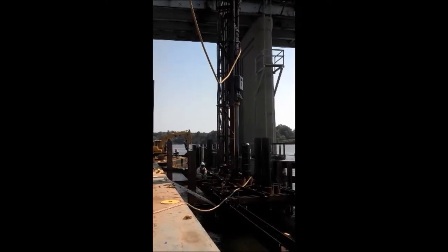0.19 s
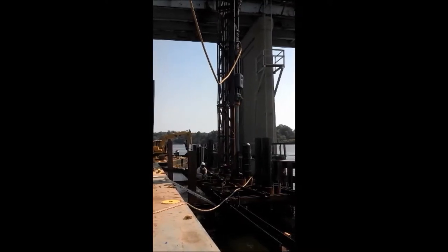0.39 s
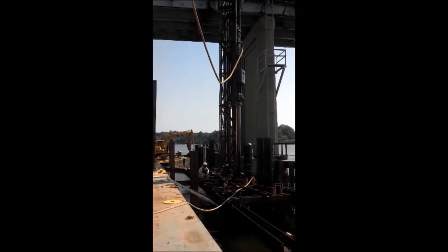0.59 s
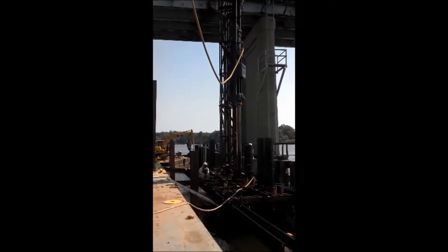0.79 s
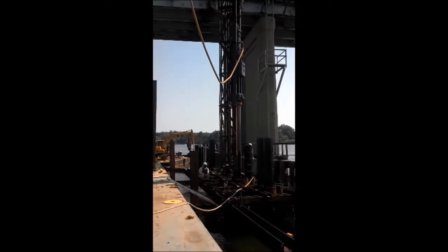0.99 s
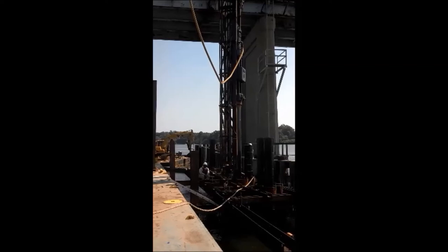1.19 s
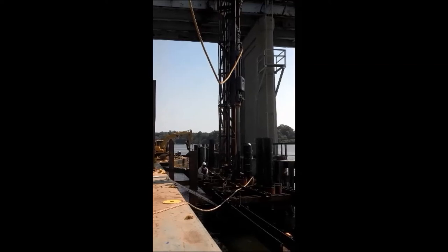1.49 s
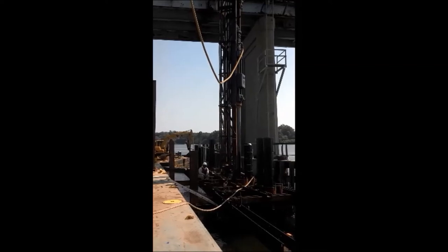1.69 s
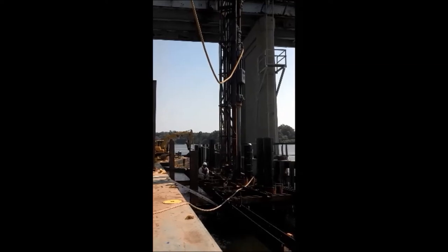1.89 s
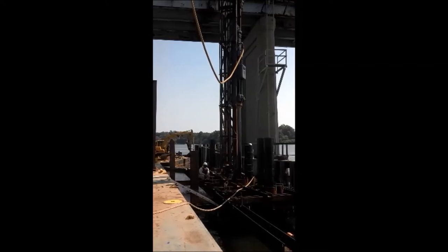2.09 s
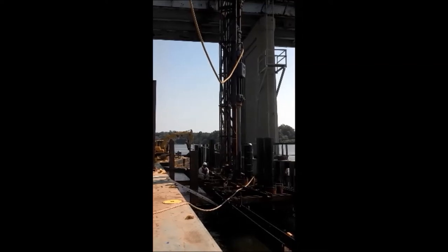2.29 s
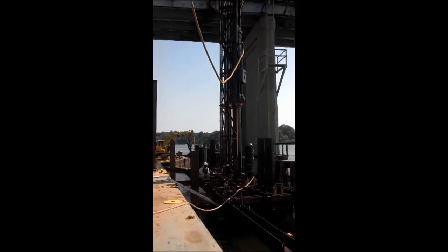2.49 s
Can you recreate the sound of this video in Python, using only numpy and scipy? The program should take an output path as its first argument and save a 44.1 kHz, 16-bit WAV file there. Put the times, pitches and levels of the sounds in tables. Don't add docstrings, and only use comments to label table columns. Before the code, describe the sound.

A pile hammer clangs twice on steel, hissing out spent air between blows over a steady engine-like drone

```python
import sys
import numpy as np
from scipy import signal
from scipy.fft import rfft, irfft, next_fast_len
from scipy.io import wavfile
from scipy.ndimage import uniform_filter1d

SR = 44100
rng = np.random.default_rng(int(sys.argv[2]) if len(sys.argv) > 2 else 0)


def output_pcm(signal):
    pcm = np.clip(np.atleast_2d(signal).T, -1, 1) * 32767
    wavfile.write(sys.argv[1], SR, np.round(pcm).astype(np.int16))


def decibels_to_gain(level_db):
    exponent = np.asarray(level_db, float) / 20
    return 10 ** exponent


N = 114660
T = np.arange(N) / SR

# frequency in Hz, level in dB.
DRONE_SPECTRUM = [(30, -45.5), (80, 6), (130, -4), (250, -1), (700, -1), (1200, -8.5), (3000, -20),
                  (10000, -34.5)]
DRONE_DB = -35
# time in seconds, level change in dB.
COMPRESSOR_LOAD = [(0, 0), (.15, 3), (.6, -1), (.75, -3), (.88, -1.5), (1.2, 0.5), (1.36, 1.5), (1.43, 3),
                   (1.9, -2.5), (2.08, -1), (2.18, 0.5), (2.45, 3), (2.6, -0.5)]
# frequency in Hz, width in Hz, level in dB.
HUMS = [(133, 10.5, -51), (204.6, 26, -48.5), (257, 8.4, -56), (406, 69, -55)]
WHINES = [(2014, 20, -59), (4042, 54, -63), (4360, 50, -68), (4700, 14, -60.5), (5870, 90, -70),
          (6820, 33, -67), (7770, 23, -71), (7950, 60, -93), (12150, 80, -79), (12620, 50, -92),
          (13740, 50, -92), (14050, 60, -104), (15600, 3200, -82)]

# start in seconds, level in dB, hold in seconds, pipe ring in dB.
EXHAUSTS = [
    (-.36, -21.5, .03, 3),
    (0.913, -20, 0.024, 4),
    (2.204, -20.5, 0.029, 2.5),
]
# frequency in Hz, level in dB.
EXHAUST_SPECTRUM = [(200, -13.5), (400, -2.5), (700, -3.5), (1300, -5.5), (2500, -4.5), (4200, -6.5),
                    (6500, -9), (10000, -19), (15000, -20)]
# frequency in Hz, time to fall 60 dB in seconds.
EXHAUST_T60 = [(200, 0.44), (1000, 1), (4000, 0.72), (16000, 0.3)]
# frequency in Hz, width in Hz, level in dB.
PIPE_MODES = [(723, 81, 3), (1120, 73, 2.5), (1407, 17, 10), (1770, 33, -4), (1900, 13, -14.5),
              (2135, 69, -5)]
OPENING_S, OPENING_DB = 0.017, -19
LINGER_DB, LINGER_T60 = -7, 1.24
PIPE_FALL_DB_PER_S = 46
GUST_DB = -0.5

# start in seconds, length in seconds, level in dB.
VALVES = [
    (0.163, 0.028, -28),
    (1.438, .03, -31.5),
]
# frequency in Hz, level in dB.
VALVE_SPECTRUM = [(400, -29), (900, -2), (2000, -1.5), (4000, -6.5), (6000, -14), (9000, -22), (16000, -46)]

# start in seconds, level in dB.
TAILS = [
    (0.271, -20.5),
    (1.543, -17.5),
]
# frequency in Hz, level in dB.
TAIL_SPECTRUM = [(80, -23), (140, -10.5), (260, -3.5), (700, -5), (1300, -10), (2200, -9), (4500, -19),
                 (16000, -55)]
# frequency in Hz, time to fall 60 dB in seconds.
TAIL_T60 = [(100, 1.97), (300, 2.59), (1000, 1.06), (4000, 0.61), (16000, 1.3)]

# frequency in Hz, 60 dB decay in seconds, first and second blow levels in dB.
FRAME_MODES = [(1186, 1, -31.5, -45), (2050, 0.77, -28, -53), (3100, 0.5, -53, -49), (3920, 1, -42.5, -53),
               (4200, 0.53, -45, -36), (4890, 0.53, -39, -39), (5460, 0.56, -35, -56),
               (6230, 0.45, -45, -39.5), (6950, 0.38, -37, -50), (13050, .4, -58, -58),
               (13870, 0.36, -39, -54), (14100, .4, -53, -60)]
WANDER_HZ = 9

# arrival in seconds, boom in dB, clang in dB, sizzle in dB.
ARRIVALS = [(0.2003, -12, -21, -23), (0.22, -22.5, -19, -49), (0.242, -12, -16, -47), (0.26, -19, -13, -23),
            (0.275, -9, -19, -28), (0.293, -39, -13.5, -25.5), (0.329, -19.5, -22, -38),
            (0.357, -24, -25, -33), (1.4742, -11.5, -17.5, -24.5), (1.492, -15.5, -19, -49),
            (1.514, -12.5, -19, -45), (1.534, -11, -15.5, -25.5), (1.551, -20, -16.5, -41),
            (1.573, -14.5, -35, -38), (1.605, -23, -48, -31.5), (1.63, -20, -47, -35.5),
            (1.659, -22.5, -46, -51)]
BLOW_STARTS = (ARRIVALS[0][0], ARRIVALS[8][0])
BOOM_T60, CLANG_T60, SIZZLE_T60 = 0.13, 0.19, 0.12
# frequency in Hz, width in Hz, level in dB.
BOOM_MODES = [(146, 25, -4.5), (190, 100, -13), (250.5, 28.5, 3.5), (332, 21, 12), (363, 16, 2),
              (470, 20.2, -10)]
CLANG_MODES = [(539, 20, 5), (652, 31, 4.5), (753, 31, 5), (1050, 126, -4.5), (1195, 60, 0),
               (1390, 56, -3.5), (1837, 37, -8.5), (1993, 23, -5), (2490, 58, -13)]
# frequency in Hz, level in dB.
CLANG_WASH = [(300, -15), (500, 0), (1000, 4.5), (2000, -10), (3000, -23), (5000, -36)]
SIZZLE_SPECTRUM = [(1500, -23.5), (2800, 2.5), (4200, 3.5), (6000, -4), (8000, -4.5), (10000, -9),
                   (13000, -15), (16000, -9)]
# frequency in Hz, level in dB, time to fall 60 dB in seconds.
ANVIL_RINGS = [(3680, -29, 0.096), (3830, -52, 0.12), (4480, -58, .25), (6700, -36, 0.16),
               (6850, -16, 0.031), (7100, -41, 0.08)]
CRACK_DB, CRACK_T60 = (-33, -22), 0.043
# delay in seconds, frequency in Hz, glide in Hz/s,
# length in seconds, level in dB.
THUDS = [(0.0012, 360, -1500, 0.04, -21.5), (0.0069, 145, -600, 0.024, -17.5),
         (0.037, 254, -500, 0.024, -8.5), (.058, 236.8, 2300, 0.035, -9), (0.02116, 315, 0, 0.011, -18),
         (0.0618, 570, 1495, 0.033, -17), (0.034, 400, 0, 0.038, -22), (0.11, 377, 0, 0.018, -21),
         (0.075, 257, 0, 0.023, -16.5), (0.086, 1600, 0, 0.031, -26), (.07, 1770, 0, 0.038, -25.5),
         (0.117, 225, 0, 0.019, -24)]
THUD_DB, THUD_PITCH = (-0.2, 0.4), (1.01, 1)

# frequency in Hz, turn in radians.
PORT_TURN = [(40, -6.2), (100, -4.9), (215, -3.1), (300, -2.3), (370, -.4), (580, 1.3), (900, .8),
             (1400, 0)]
# frequency in Hz, likeness from 0 to 1.
PORT_LIKENESS = [(40, 0.92), (250, 0.56), (600, 0.48), (1000, 0.79), (1500, 0.99), (3500, 0.9),
                 (5500, 0.79), (8300, 0.66), (16000, 0.32)]
# frequency in Hz, level in dB.
LEFT_DB = [(40, 1), (120, -3), (200, -6), (300, -8), (600, -2.5), (950, -2), (1400, 0), (16000, 0)]
PORT_LAG_S = 16 / SR
OPPOSED_LIKENESS = 0.63
LOW_CUT_HZ, EDGE_HZ, SUB_DB = 130, 15780, -55.5


def evened(x):
    return x / np.sqrt(np.mean(x ** 2) + 1e-20)


def read(points, hz):
    f, value = np.transpose(points)
    return np.interp(np.log(hz + 1), np.log(f + 1), value)


def noise(spectrum):
    z = rfft(rng.standard_normal((2, N)))
    z = z * decibels_to_gain(read(spectrum, np.fft.rfftfreq(N, 1 / SR)))
    return evened(irfft(z, N))


def wobble(samples):
    return evened(uniform_filter1d(rng.standard_normal(N), size=samples))


def resonate(x, modes):
    out = 0
    for hz, width, db in modes:
        b, a = signal.iirpeak(hz, hz / max(width, 2), SR)
        out = out + decibels_to_gain(db) * signal.lfilter(b, a, x)
    return out


def fading(start, t60, rise):
    t = np.maximum(T - start, 0)
    return np.minimum(t / rise, 1) ** 2 * decibels_to_gain(-120 * t / t60)


def dying(spectrum, t60s, starts, rise):
    hz, t, z = signal.stft(noise(spectrum), SR, nperseg=256, noverlap=192)
    t60 = read(t60s, hz)[:, None]
    power = 0
    for start, db in starts:
        elapsed = np.maximum(t - start - rise, 0)
        power = power + decibels_to_gain(2 * db - 120 * elapsed / t60) * (t > start - .004)
    return signal.istft(z * np.sqrt(power), SR, nperseg=256, noverlap=192)[1][:, :N]


def drone():
    load_db = np.interp(T, *np.transpose(COMPRESSOR_LOAD))
    wash = decibels_to_gain(DRONE_DB + load_db) * decibels_to_gain(1.1 * wobble(1500)) * noise(DRONE_SPECTRUM)
    return wash + 33.0 * resonate(rng.standard_normal((2, N)), HUMS + WHINES)


def reverberation():
    swell = sum(np.clip((T - s + .05) / 0.043, 0, 1) * (T < s + .6) for s, _ in TAILS)
    starts = [(s - .05, db) for s, db in TAILS]
    return dying(TAIL_SPECTRUM, TAIL_T60, starts, 0.021) * np.where(swell > 0, swell, 1)


def exhaust():
    out = 0
    for start, db, hold, ring_db in EXHAUSTS:
        opening = decibels_to_gain(OPENING_DB * np.clip(1 - (T - start) / OPENING_S, 0, 1)) * (T > start)
        air = dying(EXHAUST_SPECTRUM, EXHAUST_T60, [(start, db)], OPENING_S + hold)
        since_hold = np.maximum(T - start - OPENING_S - hold, 0)
        pipe = decibels_to_gain(ring_db - PIPE_FALL_DB_PER_S * since_hold) * resonate(air, PIPE_MODES)
        linger_db = db + LINGER_DB - 60 * np.maximum(T - start, 0) / LINGER_T60
        linger = decibels_to_gain(linger_db) * noise(EXHAUST_SPECTRUM)
        out = out + opening * (air + pipe + linger)
    return out * decibels_to_gain(GUST_DB * wobble(150))


def valve():
    shape = 0
    for start, length, db in VALVES:
        rise = np.clip((T - start) / 0.0051, 0, 1)
        fall = decibels_to_gain(-700 * np.maximum(T - start - length, 0))
        shape = shape + decibels_to_gain(db) * rise * fall
    return shape * noise(VALVE_SPECTRUM)


def frame():
    out = 0
    for hz, t60, *dbs in FRAME_MODES:
        beat = decibels_to_gain(3.5 * np.clip(wobble(700), -3, 1.5))
        drift = np.cumsum(WANDER_HZ * wobble(400)) / SR
        shape = 0
        for (start, _), db in zip(TAILS, dbs):
            shape = shape + decibels_to_gain(db + 1.4 / t60) * np.sqrt(fading(start - .07, t60, 0.11))
        tone = np.sin(2 * np.pi * (hz * T + drift + rng.random()))
        out = out + shape * beat * np.sqrt(2) * tone
    return out


def thuds():
    out = np.zeros(N)
    for start, blow_db, pitch in zip(BLOW_STARTS, THUD_DB, THUD_PITCH):
        for delay, hz, glide, length, db in THUDS:
            t = np.clip(T - start - delay, 0, length)
            turns = pitch * (hz + glide * t / 2) * t + rng.random()
            out += decibels_to_gain(db + blow_db) * np.sin(np.pi * t / length) * np.sin(2 * np.pi * turns)
    return out


def arrival_envelope(column, t60):
    return np.sqrt(sum(decibels_to_gain(2 * row[column]) * fading(row[0], t60, 0.00087) for row in ARRIVALS))


def boom():
    drum = resonate(rng.standard_normal((2, N)), BOOM_MODES)
    drum = resonate(drum, [(284, 1040, 0)])
    drum = drum / np.sqrt(uniform_filter1d(drum ** 2, size=500) + 0.092 * np.mean(drum ** 2))
    envelope = signal.lfilter(np.ones(220) / 220, 1, arrival_envelope(1, BOOM_T60))
    return 1.4 * drum * envelope


def clang():
    drive = arrival_envelope(2, CLANG_T60) * decibels_to_gain(1.74 * wobble(60))
    modes = resonate(drive * rng.standard_normal((2, N)), CLANG_MODES)
    return 3.8 * modes + 0.57 * drive * noise(CLANG_WASH)


def sizzle():
    return arrival_envelope(3, SIZZLE_T60) * decibels_to_gain(2.5 * wobble(90)) * noise(SIZZLE_SPECTRUM)


def anvil():
    out = np.zeros((2, N))
    for start, crack_db in zip(BLOW_STARTS, CRACK_DB):
        crack = np.sqrt(fading(start, CRACK_T60, 0.00046)) * rng.standard_normal((2, N))
        out += decibels_to_gain(crack_db) * crack
        for hz, db, t60 in ANVIL_RINGS:
            tone = np.sin(2 * np.pi * (hz * T + rng.random((2, 1))))
            out += decibels_to_gain(db) * np.sqrt(fading(start, t60, 0.00029)) * tone
    return out


def blows():
    return thuds() + boom() + clang() + sizzle() + anvil()


def scene():
    return drone() + reverberation() + exhaust() + valve() + frame() + blows()


def top_cut(x):
    return signal.sosfilt(signal.butter(12, 16950, fs=SR, output="sos"), x)


def record(dry):
    size = next_fast_len(N + 4096)
    hz = np.fft.rfftfreq(size, 1 / SR)
    right, own = rfft(dry, size)
    phase = np.pi + 2 * np.pi * hz * PORT_LAG_S + read(PORT_TURN, hz)
    phase = phase - np.where(hz > 9800, .3, .14) * np.sin(2 * phase)
    same = np.clip(read(PORT_LIKENESS, hz), 0, 1)
    same = same + (1 - same) * OPPOSED_LIKENESS * (hz > 4500) * np.sin(phase / 2) ** 4
    left = same * np.exp(-1j * phase) * right + np.sqrt(1 - same ** 2) * own
    left = decibels_to_gain(read(LEFT_DB, hz)) * left
    low_cut = 1 / np.sqrt(1 + (LOW_CUT_HZ / (hz + 1)) ** 8)
    ports = irfft(np.array([left, right]) * low_cut, size)[:, :N]
    loudness = np.sqrt(uniform_filter1d(ports[1] ** 2, size=1500) + 1e-9)
    rumble = noise([(20, -23), (40, 21), (70, -10), (100, -27.5), (200, -80)])[0] * loudness ** 1.24
    limited = 1.2 * np.tanh(ports / 1.25)
    edge = np.clip((EDGE_HZ - hz) / 60, .03 * (hz < 16350), 1)
    limited = irfft(rfft(limited, size) * edge, size)[:, :N]
    return top_cut(limited + decibels_to_gain(SUB_DB + 22.5) * rumble * [[1], [-.45]])


dry = scene()
out = record(dry)
output_pcm(out)
```